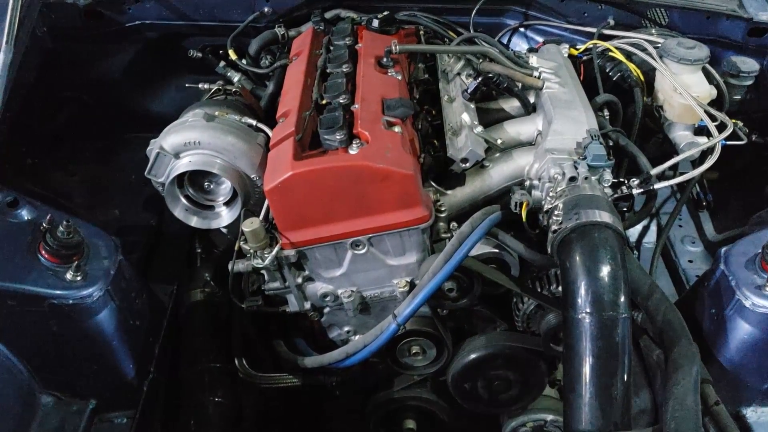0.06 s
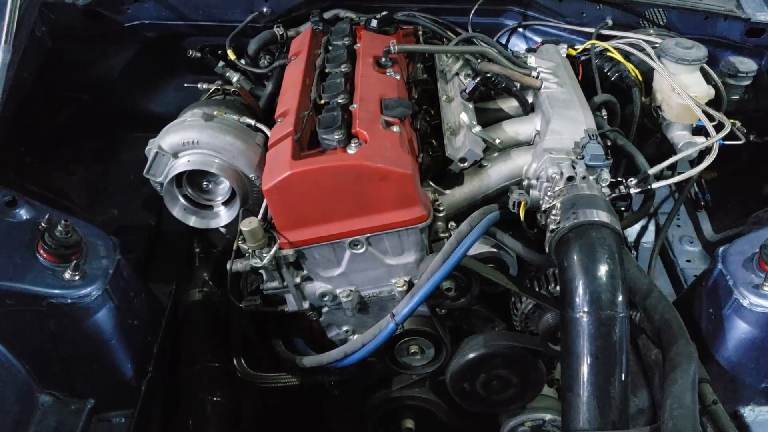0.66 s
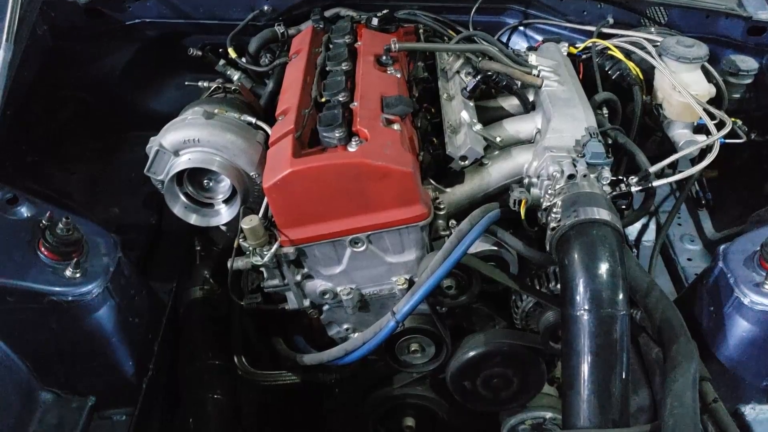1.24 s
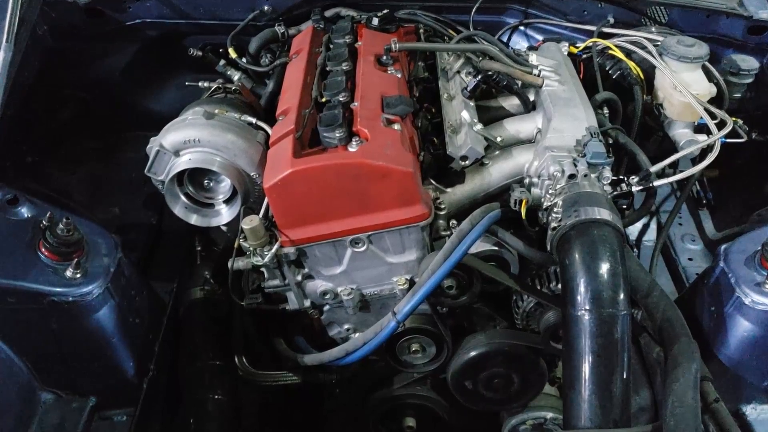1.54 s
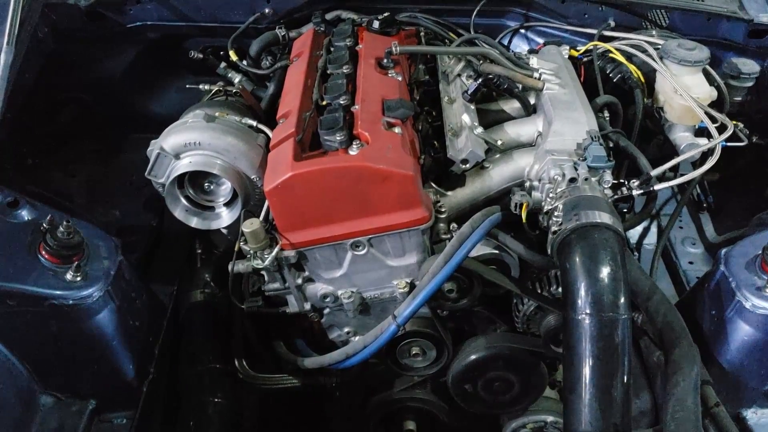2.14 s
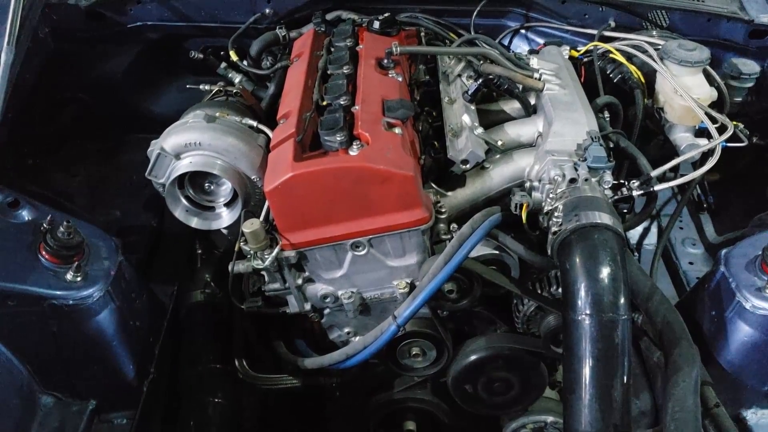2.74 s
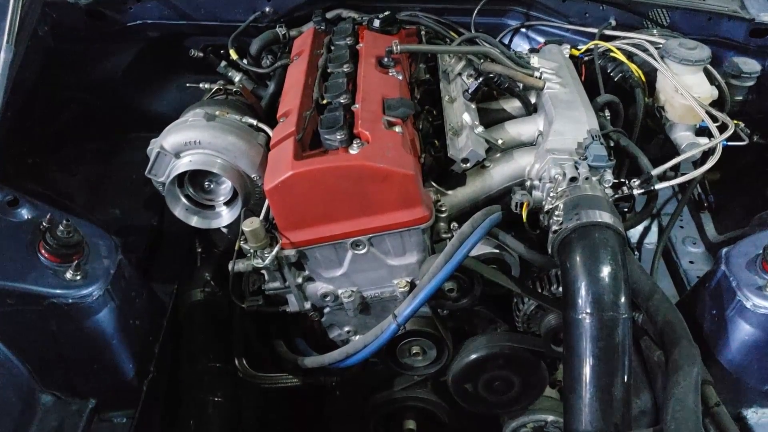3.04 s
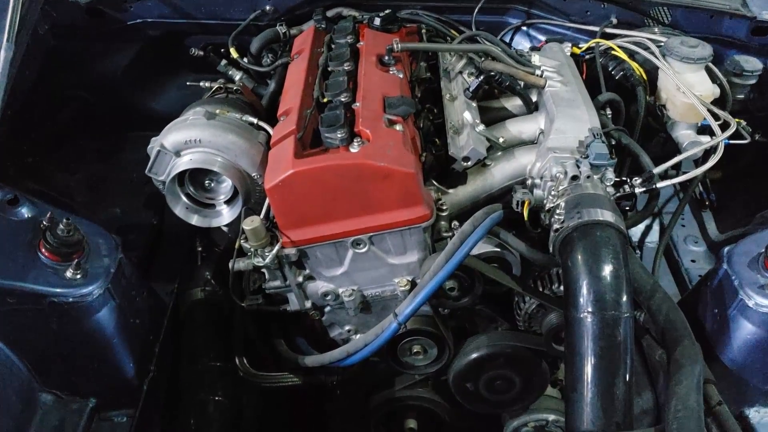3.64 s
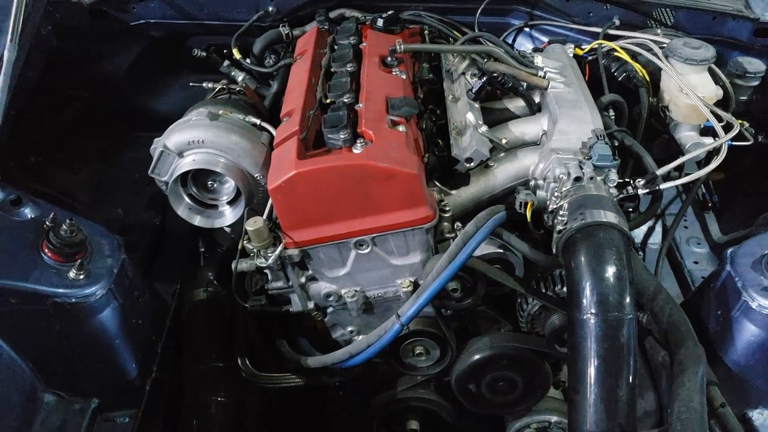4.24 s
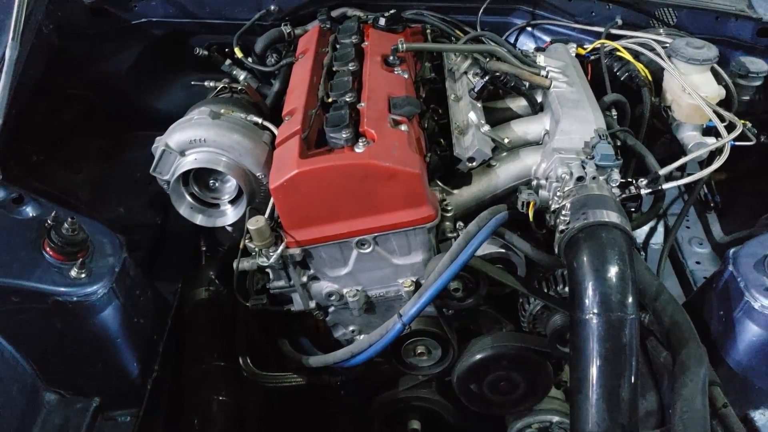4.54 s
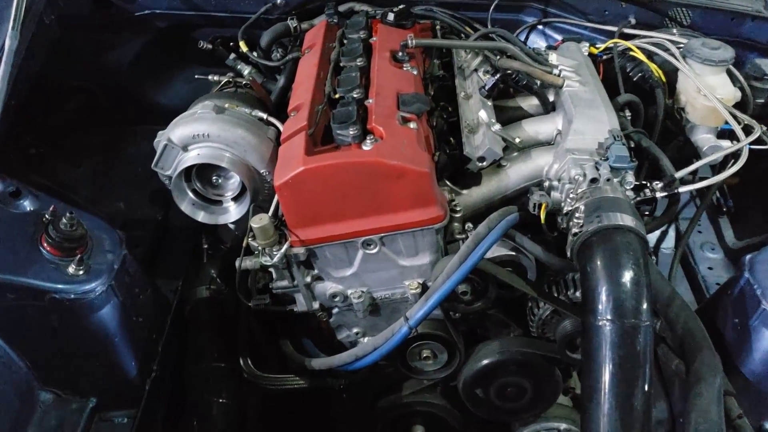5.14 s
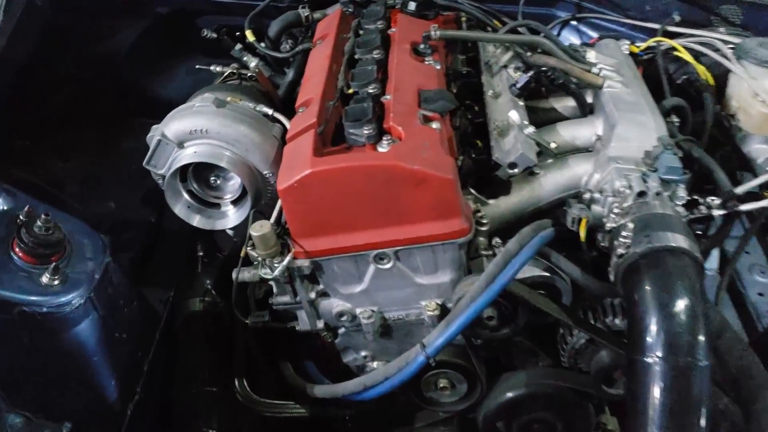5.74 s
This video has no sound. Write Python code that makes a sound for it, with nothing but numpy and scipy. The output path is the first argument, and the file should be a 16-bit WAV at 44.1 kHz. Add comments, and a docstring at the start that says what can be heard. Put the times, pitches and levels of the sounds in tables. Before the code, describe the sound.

A turbocharged four-cylinder car engine idles, heard from just above the open engine bay. Its deep exhaust boom swells and dips as the speed wavers and slowly creeps up. Over it lie a steady mechanical whirr, fast high injector ticking, faint thin whines and a few tiny metal chirps. From about halfway, a loose metal part rattles in short, irregular bursts.

```python
"""Idling four-cylinder turbo engine

Heard from just above the open bay, the speed hunts, then creeps up. The exhaust booms as its orders,
multiples of the firing rate, cross the pipe's resonances. Friction of valve gear and belts rings the
block, injectors tick at every firing, and thin whines and chirps lie over them.
At the faster idle a loose part rattles in bursts."""
import sys
import numpy as np
from scipy import signal
from scipy.fft import rfft, irfft
from scipy.io import wavfile
from scipy.ndimage import uniform_filter1d, minimum_filter1d

SR = 44100
rng = np.random.default_rng(int(sys.argv[2]) if len(sys.argv) > 2 else 0)


def inscribe(sig):
    """Save sig as 16-bit PCM at rate SR to the path in sys.argv[1].

    A 1-D sig is mono; a 2-D sig holds one channel per row.
    Samples are clipped to [-1, 1] before scaling.
    """
    pcm = np.round(np.clip(np.atleast_2d(sig).T, -1, 1) * 32767)
    wavfile.write(sys.argv[1], SR, pcm.astype(np.int16))


N = 255339
T = np.arange(N) / SR
HZ = np.fft.rfftfreq(N, 1 / SR)

# Engine speed as firing rate: t/s, f/Hz
FIRING_RATE = [(0.0, 30.06), (0.41, 31.87), (0.55, 34.45), (0.88, 35.85), (1.05, 34.2), (1.25, 35.02),
               (1.46, 33.96), (2.05, 36.43), (2.59, 37.27), (2.93, 38.66), (3.34, 37.94), (3.67, 38.97),
               (3.89, 38.97), (4.18, 40.13), (4.62, 39.43), (5.32, 38.67), (5.55, 39.11), (5.79, 38.69)]
# Strength of the exhaust pulses: t/s, level/dB (levels in all tables are relative)
PULSE_STRENGTH = [(0, -1.7), (.4, -2), (.58, -6.5), (.8, -0.7), (1.25, -0.5), (1.5, -2), (1.95, -0.8),
                  (3.4, -0.64), (4.35, 0.4), (5.15, 1), (5.79, 0.9)]
# Deepest boom, firing order 2: t/s, level/dB
SECOND_ORDER = [(0, -21), (.2, -38.5), (.36, -26), (.47, -24), (.67, -18), (.76, -33), (.85, -16.5),
                (1.0, -17.5), (1.13, -33), (1.29, -18), (1.45, -22), (1.73, -31), (1.93, -17.5),
                (2.45, -12.5), (2.9, -20.5), (5.79, -18.5)]
# Exhaust fundamental against firing rate: f/Hz, level/dB
FIRST_ORDER = [(31, -51), (35, -38)]
# Firing orders 3 to 6 of a pulse, before the pipe: level/dB
PULSE_SPECTRUM = [-25.5, -28, -34.5, -40.5]
# Resonances and notches of the exhaust pipe: f/Hz, width/Hz, gain/dB
PIPE_MODES = [(101.8, 2.8, -6.5), (106.5, 10.25, 12.5), (114.2, 12.4, 10.5), (144.4, 7.8, 9),
              (181, 4.2, 11.5), (184.8, 2.87, -15), (187.7, 10.3, 16.5), (203.8, 14.7, 8.5)]
# Panel resonances: f/Hz, width/Hz, level/dB
PANEL_MODES = [(236.3, 5.1, -39.5), (255.8, 7.8, -29.5), (273, 22, -35.5)]
# Mechanical noise: t/s, valve gear and belt level/dB, injector level/dB
MECHANICAL_LEVELS = [(0, -37, -43.5), (1.85, -37, -42.5), (2.2, -37.5, -44), (3.5, -37.5, -45),
                     (5.1, -37, -43), (5.79, -35.5, -40.5)]
# Spectral density of the friction noise: f/Hz, level/dB
FRICTION_SPECTRUM = [(25, -19), (60, 9), (150, 9), (280, 8.5), (400, 4.5), (520, -1.5), (900, -2.5),
                     (1800, -5), (3200, -5.5), (6000, -9.5), (7200, -14), (8500, -17), (16000, -11.5)]
# Resonances of block, covers and brackets: f/Hz, width/Hz, gain/dB
BLOCK_MODES = [(363, 27, 8.5), (633, 8.3, 7), (850.5, 12, 8.5), (1429, 225, 6.5), (2050, 140, 7),
               (2201, 32, 7.5), (2492, 21, 6), (2913, 105, 8), (3840, 380, 4), (4146, 66, 7.5),
               (5760, 270, 3), (9170, 120, 11)]
# Friction noise, left minus right: f/Hz, level/dB
FRICTION_BALANCE = [(100, 25), (330, 1), (500, 5), (800, 5), (1200, 9.5), (1800, 9.5), (2700, 5),
                    (4200, 5.5), (6400, 7), (9500, 2)]
# Likeness of the friction noise at the two ears: f/Hz, correlation
EAR_CORRELATION = [(150, 0.13), (330, 0.62), (600, 0.69), (1200, 0.33), (2200, 0.13), (4000, 0.069),
                   (12000, 0.022)]
# Timing of the ticks against the exhaust boom, by firing rate: f/Hz, offset/firings
TICK_OFFSET = [(34.5, -.1), (39.5, .18)]
# The four injectors in firing order: level/dB, time held open/s
INJECTOR_VALVES = [(4, .0016), (2, .0036), (3.5, 0.0018), (4, 0.002)]
# Spectral density of the injector ticks: f/Hz, level/dB
TICK_SPECTRUM = [(100, -21), (3000, -40), (6000, -36), (8200, -12), (9500, -3.5), (11000, 5), (11900, 8),
                 (13000, 3.5), (15500, 2), (16500, -20)]
# Injector ticks, left minus right: f/Hz, level/dB
TICK_BALANCE = [(6000, -14), (8500, -18), (10000, -12.5), (12000, -9), (13500, -5), (16000, -9)]
# Whines of the accessories: f/Hz, level/dB
ACCESSORY_TONES = [(2236, -55.5), (6596, -64.5)]
# Runs of metal chirps: t/s, count, f/Hz, level/dB
CHIRP_RUNS = [(.07, 5, 3720, -34.5), (.572, 1, 3940, -32), (2.943, 1, 4050, -32), (5.033, 1, 4100, -32)]
# Singing of a belt: t/s, level/dB
BELT_LEVEL = [(0, -64), (1.1, -49), (1.5, -67), (4.9, -52), (5.3, -47), (5.65, -40.5), (5.79, -51)]
# Bursts of rattling: t/s, number of knocks, level/dB
RATTLE_BURSTS = [(2.777, 2, -28.5), (2.949, 4, -27.5), (3.236, 1, -29.5), (3.583, 4, -25.5),
                 (3.87, 4, -26.5), (4.148, 1, -30), (4.31, 1, -30.5), (4.702, 1, -30), (4.984, 4, -27),
                 (5.612, 2, -25.5)]
# Modes of the loose part: f/Hz, width/Hz, level/dB
LOOSE_MODES = [(1073, 15, -7.5), (1225, 45, 0), (1400, 100, -5.5), (1860, 210, -23), (2300, 210, -39),
               (4054, 110, -5), (5000, 1200, -33)]


def amp(db):
    """Amplitude ratio for a level in decibels."""
    return 10 ** (np.asarray(db) / 20)


def unit(x):
    """Normalisation to rms 1."""
    return x / np.sqrt(np.mean(x ** 2) + 1e-20)


def curves(table):
    """Linear interpolation of each column over time."""
    times, *columns = np.transpose(table)
    return [np.interp(T, times, column) for column in columns]


def spectrum(table):
    """Interpolation over log frequency, at every bin."""
    hz, value = np.transpose(table)
    return np.interp(np.log(HZ + 1), np.log(hz + 1), value)


def pan(side_db):
    """Ear gains for an interaural level difference, left minus right."""
    return amp(np.array([[.5], [-.5]]) * side_db)


def drift(rate_hz, size=4096):
    """Slow random fluctuation: low-passed noise of rms about 1."""
    step_s = T[-1] / (size - 1)
    rolloff = 1 + (np.fft.rfftfreq(size, step_s) / rate_hz) ** 4
    slow = irfft(rfft(rng.standard_normal(size)) / rolloff)
    return np.interp(T, np.arange(size) * step_s, unit(slow))


def add(mix, start_s, sound):
    """Superposition of a sound on the mix at a given time."""
    part = mix[..., max(round(start_s * SR), 0):][..., :sound.shape[-1]]
    part += sound[..., :part.shape[-1]]


def lift(modes, hz):
    """Gain in decibels of a set of bell-shaped peaks and notches."""
    return sum(db / (1 + (2 * (hz - centre) / width) ** 2) for centre, width, db in modes)


def resonate(x, hz, width):
    """Response of one damped mode, scaled to rms 1."""
    pole = np.exp((2j * np.pi * hz - np.pi * width) / SR)
    return unit(signal.lfilter([1], [1, -pole], x).real)


def swept(firings, rate, order, hz, width):
    """Forced vibration: an order swells and turns in phase as it crosses a resonance."""
    response = 1 / (1 + 2j * (order * rate - hz) / width)
    return np.sqrt(2) * (response * np.exp(2j * np.pi * order * firings)).real


def exhaust(firings, rate, panel_db=-1.5, fall_db=6.5, unevenness=0.059):
    """Harmonics of the firing pulses boom at the pipe's resonances; higher ones buzz the panels."""
    def order(k):
        lag = np.pi / 2 + np.arctan((k * rate - 184) / 7)  # half a cycle of phase turn across 184 Hz
        return -np.sqrt(2) * np.sin(2 * np.pi * k * firings - lag)
    pulse_db, = curves(PULSE_STRENGTH)
    second_db, = curves(SECOND_ORDER)
    first_db = np.interp(rate, *np.transpose(FIRST_ORDER))
    deep = amp(first_db) * order(0.99) + amp(second_db) * order(2)
    boom = sum(amp(pulse_db + db + lift(PIPE_MODES, k * rate)) * order(k)
               for k, db in enumerate(PULSE_SPECTRUM, 3))
    buzz = sum(amp(db + panel_db - fall_db * (k - 6)) * swept(firings, rate, k, hz, width)
               for k in range(6, 9) for hz, width, db in PANEL_MODES)
    pipe = (deep + boom) * (1 + unevenness * drift(13))
    panels = buzz * (1 + 0.34 * drift(3.4))
    return (pipe + panels) * pan(2)


def burble(firings, level_db=-45, centre_order=7.8, reach=2.9, waver=.35):
    """Unequal cylinders lengthen the period, so faint lines stand midway between firing orders."""
    orders = np.arange(9, 23, 2) / 2
    gains = amp(level_db) / (1 + ((orders - centre_order) / reach) ** 4)
    phases = rng.random(len(orders))
    lines = sum(gain * (1 + waver * drift(3.6)) * np.sin(2 * np.pi * (k * firings + phase))
                for k, gain, phase in zip(orders, gains, phases))
    return lines * pan(1.8)


def machinery(firings, level_db, gain_db=-1, grain_db=1.15, clatter=0.38):
    """Friction of belts and chain, modulated by valves closing twice a firing, excites the block."""
    noise = rng.standard_normal((2, N))
    valves = np.exp(-(2 * firings % 1) / .25) * (1 + .4 * drift(40))
    load = amp(grain_db * drift(67)) * (1 + clatter * valves)
    left, independent = rfft(noise * load)
    correlation = np.clip(spectrum(EAR_CORRELATION), -1, 1)
    right = correlation * left + np.sqrt(1 - correlation ** 2) * independent
    body_db = spectrum(FRICTION_SPECTRUM) + lift(BLOCK_MODES, HZ)
    ears = np.array([left, right]) * pan(spectrum(FRICTION_BALANCE)) * amp(body_db)
    midband = irfft(ears.mean(0) * ((HZ > 1800) & (HZ < 6500)), N)  # the level refers to this band
    return irfft(ears, N) / midband.std() * amp(level_db + gain_db)


def injectors(firings, rate, level_db, gain_db=2, ring_s=0.00068, tail_s=0.013, spread_db=2.4):
    """Each injector clicks open and shut; scattering in the bay draws the clicks into a short hiss."""
    offset = np.interp(rate, *np.transpose(TICK_OFFSET))
    starts = T[1:][np.diff(np.floor(firings + offset)) > 0]
    t = T[:SR // 16]
    click = np.exp(-t / ring_s) + 0.18 * np.exp(-t / tail_s)
    power = np.zeros(N)
    for k, start in enumerate(starts):
        db, open_s = INJECTOR_VALVES[k % len(INJECTOR_VALVES)]
        opening, closing = amp(db + spread_db * rng.standard_normal(2)) ** 2
        add(power, start, opening * click)
        add(power, start + open_s, 0.8 * closing * click)
    ticks = np.sqrt(power + 0.058) * rng.standard_normal((2, N))  # over a steady floor of hiss
    ticks = irfft(rfft(ticks) * amp(spectrum(TICK_SPECTRUM)) * pan(spectrum(TICK_BALANCE)), N)
    return unit(ticks) * amp(level_db + gain_db)


def whines(wander_hz=4, waver=0.72):
    """The accessories give thin tones, randomly modulated in frequency and amplitude."""
    tones = np.zeros(N)
    for hz, db in ACCESSORY_TONES:
        phase = 2 * np.pi * np.cumsum(hz + wander_hz * drift(9.2)) / SR
        tones += amp(db) * np.sin(phase) * (1 + waver * drift(3.6))
    return np.sqrt(2) * tones * pan(6.8)


def chirps(rate, rise_s=0.0032, spread_hz=50):
    """Damped vibration of thin metal: a brief ring, once or on several firings in a row."""
    t, out = T[:SR // 25], np.zeros(N)
    envelope = t / rise_s * np.exp(1 - t / rise_s)
    for start, count, hz, db in CHIRP_RUNS:
        for i in range(round(count)):
            ring = np.sin(2 * np.pi * (hz + spread_hz * rng.standard_normal()) * t)
            add(out, start + i / np.interp(start, T, rate), amp(db) * envelope * ring)
    return out * pan(5)


def cover(firings, rate, level_db=-36, hz=367, width_hz=24, waver=0.1, fall_db=3.5):
    """Odd crank orders, weaker as they go up, drive the engine cover to resonance in turn."""
    orders = np.array([19, 21, 23]) / 2  # two firings to a crank revolution
    note = sum(amp(-fall_db * i) * swept(firings, rate, k, hz, width_hz) * (1 + waver * drift(19))
               for i, k in enumerate(orders))
    return amp(level_db) * note * pan(1)


def belt(hz=2225, width_hz=100):
    """Friction noise filtered by a narrow resonance gives a breathy note."""
    level_db, = curves(BELT_LEVEL)
    rubbing = rng.standard_normal(N)
    note = resonate(resonate(rubbing, hz, width_hz), hz, width_hz)
    return amp(level_db) * note * pan(6)


def rattle(gain_db=-14.5, gap_s=.055, contact_s=.0035, bounce_s=0.0074, lead_s=0.00098, sag_db=20):
    """Impacts excite the modes of a loose metal part that swings at its own pace and bounces."""
    t, out = T[:SR // 16], np.zeros((2, N))
    rebound = 0.87 * (t > bounce_s) * np.exp(-abs(t - bounce_s) / contact_s)
    blow = np.exp(-t / contact_s) + rebound
    for start, count, burst_db in RATTLE_BURSTS:
        for i in range(round(count)):
            progress = (i + .5) / round(count)
            knock_db = burst_db + gain_db - sag_db * (progress - 0.62) ** 2  # swells, then sags
            treble_db = -3 + 2.5 * rng.standard_normal()
            forces = blow * rng.standard_normal((2, len(t)))
            direct, echo = (sum(amp(db + treble_db * (hz > 3000)) * resonate(force, hz, width)
                                for hz, width, db in LOOSE_MODES) for force in forces)
            right = (direct + echo) / np.sqrt(2)  # the far ear hears it partly by reflection
            add(out, start + i * gap_s - lead_s, amp(knock_db) * np.array([direct, right]))
    return out * pan(9)


def bracket(firings, rate, level_db=-51):
    """Sympathetic resonance: a bracket hums faintly when a high firing order meets its mode."""
    return amp(level_db) * swept(firings, rate, order=17, hz=668, width=7) * pan(5.1)


def scene():
    """The sources superpose; one crankshaft keeps the orders, valves and injectors in step."""
    rate, = curves(FIRING_RATE)
    firings = 1 / 4 + np.cumsum(rate) / SR  # phase, counted in firings
    gear_db, injector_db = curves(MECHANICAL_LEVELS)
    low = exhaust(firings, rate) + burble(firings) + cover(firings, rate) + bracket(firings, rate)
    mechanical = machinery(firings, gear_db) + injectors(firings, rate, injector_db)
    return low + mechanical + rattle() + chirps(rate) + belt() + whines()


def record(dry, window=441, edge_hz=15950):
    """Peak limiting holds the biggest booms at full scale; a low-pass filter bounds the band."""
    allowed = 1 / np.maximum(abs(dry).max(0), 1)
    gain = uniform_filter1d(minimum_filter1d(allowed, size=window), size=window)
    lowpass = signal.firwin(801, edge_hz, window=("kaiser", 9), fs=SR)
    return signal.oaconvolve(dry * gain, lowpass[None], "same", axes=1)


dry = scene()
out = record(dry)
inscribe(out)
```